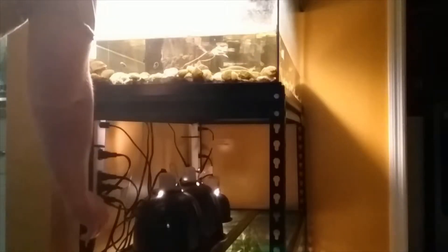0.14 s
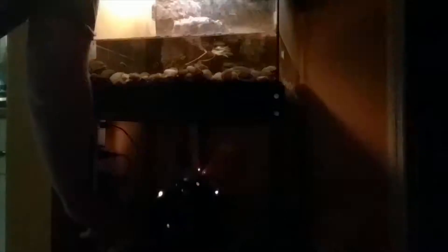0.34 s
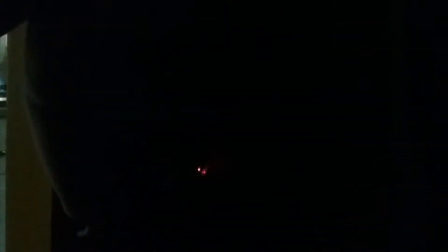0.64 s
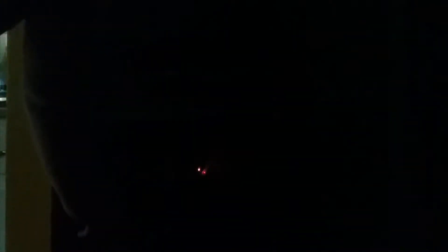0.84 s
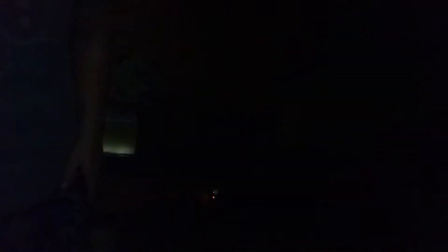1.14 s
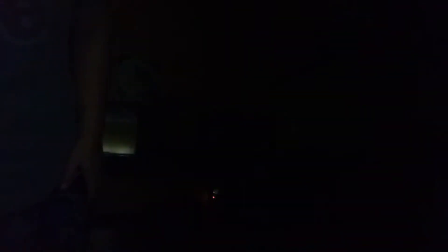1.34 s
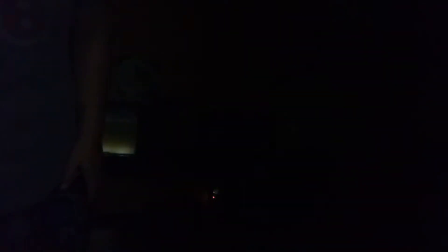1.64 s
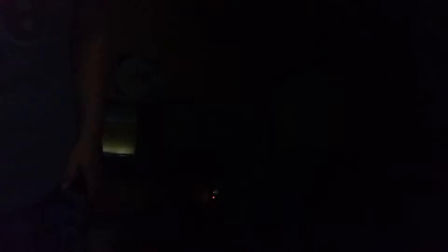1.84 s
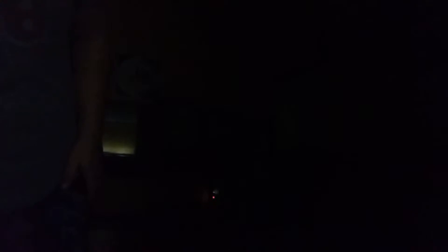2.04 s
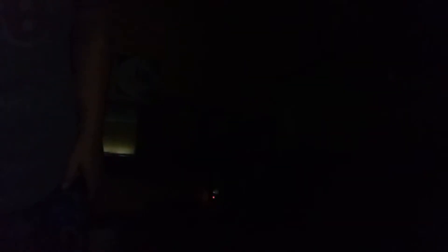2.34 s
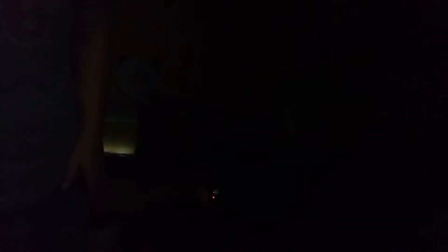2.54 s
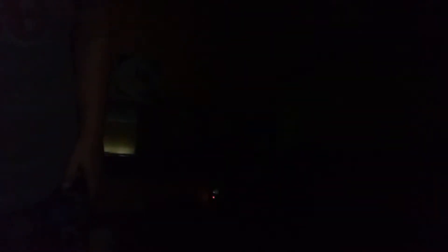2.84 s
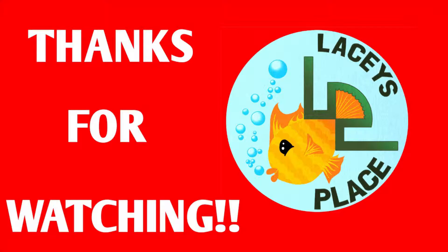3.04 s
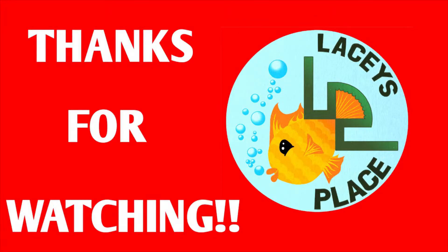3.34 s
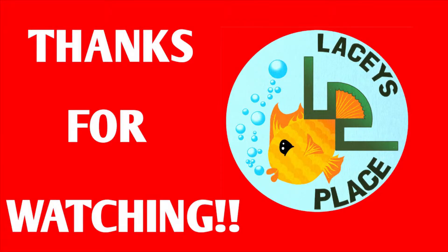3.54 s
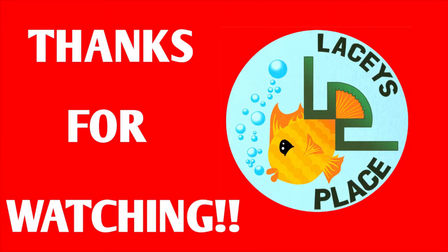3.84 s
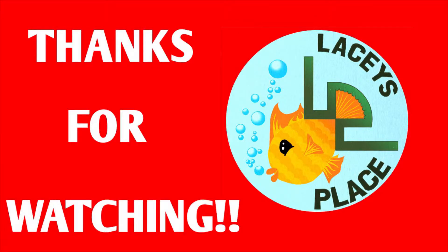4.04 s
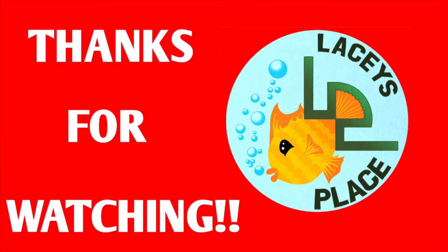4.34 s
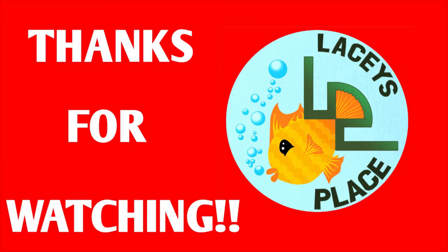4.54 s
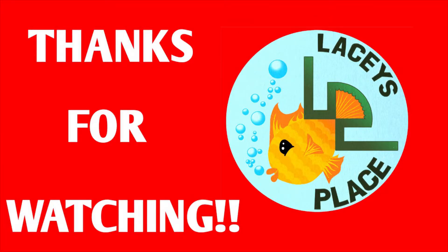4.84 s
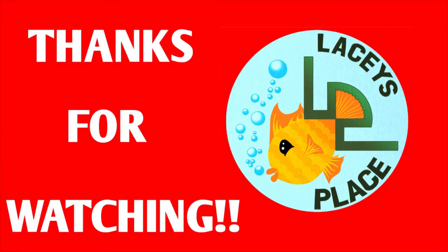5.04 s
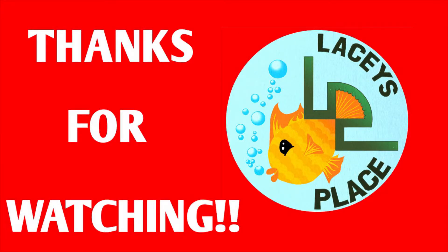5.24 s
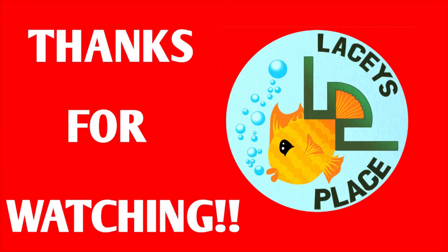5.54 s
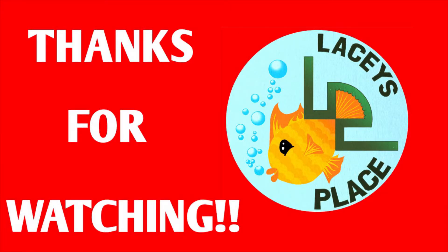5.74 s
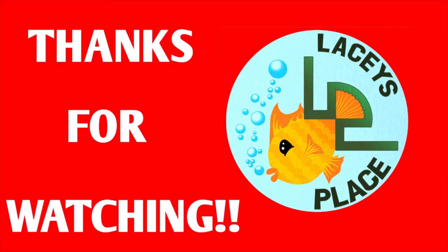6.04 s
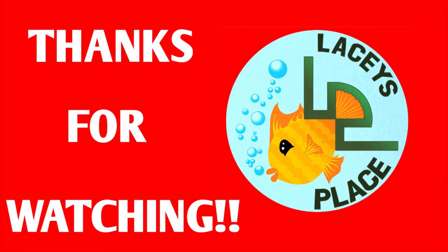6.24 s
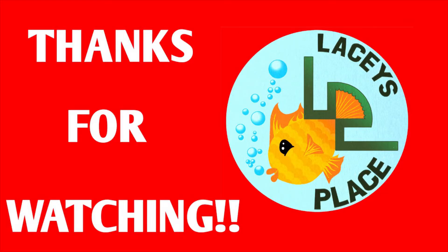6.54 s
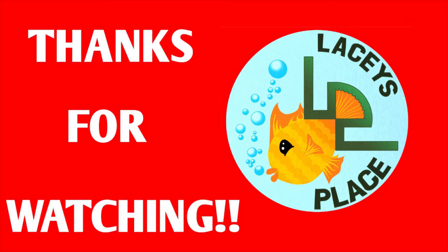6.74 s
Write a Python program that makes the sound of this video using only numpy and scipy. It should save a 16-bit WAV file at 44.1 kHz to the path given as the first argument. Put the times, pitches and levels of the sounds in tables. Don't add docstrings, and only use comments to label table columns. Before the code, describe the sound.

Steady bubbling rush of water in a fish-tank room, strong at first, then abruptly softer with stray glugs and ticks before sudden silence.

```python
import sys
import numpy as np
from scipy import signal
from scipy.fft import rfft, irfft, next_fast_len
from scipy.io import wavfile
from scipy.ndimage import uniform_filter1d

SR = 44100
rng = np.random.default_rng(int(sys.argv[2]) if len(sys.argv) > 2 else 0)


def to_linear_factor(level_db):
    exponent = np.asarray(level_db, float) / 20
    return 10 ** exponent


def store_pcm(level_fs):
    pcm = np.round(np.clip(level_fs, -1, 1) * 32767).astype(np.int16)
    wavfile.write(sys.argv[1], SR, np.atleast_2d(pcm).T)


N = 303849

# (start [s], end [s])
TAKES = [
    (0, .8688),
    (0.8733, 6.3225),
]
# (frequency [Hz], shared [dB per Hz], opposed re shared [dB], left re right [dB])
WATER_SPECTRA = [
    [(45, -81, -17, -3), (80.3, -66.5, -16.5, -2), (151.4, -70.5, -16, -5.5), (270, -69.5, -18, 2.5), (454, -74, -7.5, -11.5), (700, -75.5, 2, 6.5), (1170, -79.5, 2, 3), (1710, -83, 1.5, 5), (2770, -85, -0.5, -5), (4500, -96, 0.5, 7), (6700, -94, -0.8, 5), (9400, -105, 0.5, -18), (11800, -94.5, -1, -3.5), (15260, -90, 0.8, 0)],
    [(45, -94.5, -3, 1), (79, -72, -28, 4.5), (151, -67, -19, -2), (285, -72, -18.5, 8), (490, -72, -4, -2), (740, -76.5, -2.5, 8), (1150, -81.5, 0, -7.5), (1560, -87, 3.5, -2), (2690, -90.5, -1.9, 10.5), (4490, -97, 0.7, -5), (6650, -97, -0.5, 3.5), (9500, -103.5, 1.2, -8), (13000, -95.5, -1, 0.5), (15260, -95.5, 1.5, 2.5)],
]
# (time [s], level [dB])
FLOW_CURVES = [
    [(0.0, -38), (0.65, -37.5), (0.658, -39), (0.74, -36), (0.86, -38.5)],
    [(0.88, -43.5), (1.38, -41), (2.63, -43), (4.16, -40), (4.17, -38), (4.26, -41), (4.29, -39),
     (4.4, -42), (4.46, -40), (4.61, -44), (4.64, -40.5), (6.04, -42), (6.3, -43.5)],
]
FLOW_LAYERS_HZ = (877, 3550, 12000)
FLOW_FOLLOW = (0.96, 1, 0.49)
# (time [s], level [dB], pitch [Hz])
GLUGS = [(0.199, -25, 565), (0.269, -27.5, 1175), (0.34, -22, 588), (0.399, -22.5, 789), (0.527, -35, 595),
         (0.739, -26, 590), (1.269, -42, 686), (1.309, -28, 1330), (2.279, -36, 754), (3.461, -24.5, 484),
         (4.16, -24, 744), (4.428, -27, 598), (4.706, -29.5, 455), (5.533, -27, 502), (5.693, -32, 597),
         (6.266, -34, 664)]
# (time [s], level [dB], pitch [Hz])
DRIPS = [(0.02, -30, 2970), (0.2698, -34, 3260), (.505, -35, 7540), (.675, -35, 5240), (0.7721, -32, 2780),
         (.93, -38, 5950), (1.6616, -34, 3110), (1.72, -40, 5850), (4.1954, -36.5, 2700),
         (5.6917, -36, 3270), (6.308, -36, 6980), (6.311, -38, 6200)]
# (time [s], level [dB], pitch [Hz])
LID_PINGS = [(1.945, -37.5, 6150), (1.96, -37, 6450), (2.23, -38, 6500), (2.26, -40, 6900),
             (2.75, -42, 5100), (3.965, -38.5, 5100), (5.555, -39, 12400), (5.965, -32, 4100)]
# (time [s], level [dB])
SPITS = [(0.0358, -40), (0.0957, -40.5), (0.2848, -36.5), (0.411, -39.5), (0.4494, -38), (0.6752, -37),
         (0.8228, -38), (1.207, -42.5), (1.398, -37), (1.636, -40), (1.995, -39.5), (2.486, -41),
         (2.7145, -43), (2.845, -45), (2.9899, -45.5), (3.1406, -46.5), (3.3395, -45.5), (3.7635, -38.5),
         (3.866, -44), (4.142, -50), (4.194, -43), (4.2444, -39), (4.3497, -40), (4.4048, -40),
         (4.6385, -36), (4.9544, -41.5), (5.551, -37), (5.8977, -37), (6.1475, -47)]
# (time [s], level [dB], upper mids re top [dB], mids re top [dB], crack length [s])
SPLATS = [
    (0.66, -21.5, -2, -7, .002),
    (.5745, -27.5, -18.5, -1, 0.034),
    (3.3700, -13.5, -13.5, -10, 0.0011),
    (1.3982, -32, -15, -14, .0012),
]
# (multiple of mains, shared [dB], opposed [dB], phase of opposed [rad])
PUMP_HUM = [
    [(2, -39.0, -69.9, 2.1), (3, -61.5, -74.4, -1.8), (4, -51.2, -60.9, 1.1), (5, -67.3, -63.5, 0.8), (6, -49.9, -55.3, -0.5), (7, -60.3, -70.2, 1.6), (8, -50.4, -56.0, 1.2), (9, -60.0, -59.5, 3.0), (10, -59.9, -71.0, 1.7), (12, -61.4, -59.5, 2.4), (13, -65.9, -59.3, -1.1), (16, -64.6, -74.1, 1.2), (18, -66.0, -77.7, -1.6), (20, -68.7, -70.5, -0.3)],
    [(1, -70.9, -79.7, -1.2), (2, -46.3, -62.7, 1.6), (3, -52.6, -66.1, -0.2), (4, -56.3, -67.7, -2.8), (6, -55.3, -69.1, 1.5), (7, -60.2, -80.0, 2.4), (8, -57.5, -66.3, -0.6), (9, -71.3, -71.9, -2.5), (10, -63.0, -69.1, 1.6), (11, -62.1, -64.2, 1.8), (12, -63.5, -69.5, -2.8), (13, -60.0, -70.9, 2.5), (20, -71.3, -73.5, 1.8)],
]
# (take index, centre [Hz], width [Hz], level [dB], opposed share [0-1])
IMPELLER_TONES = [(0, 582, 14, -50, .3), (0, 123.8, 1.5, -50, .05), (0, 156, 8, -55, .3),
                  (0, 232, 8, -54, .3), (1, 79, 6, -56, .2), (1, 156, 7, -52, .4),
                  (1, 123.3, 1.2, -55, .15), (1, 234, 8, -55, .3)]
# (level [dB], first pitch [Hz], last pitch [Hz], length [s])
BUMP = (-18.5, 380, 95, .0045)
# (frequency [Hz], share subtracted [0-1], delay [samples])
CROSSFEED = [(100, .9, 20), (1000, .89, 20.1), (2200, .94, 20.5), (3300, .94, 20.1), (4400, .94, 20),
             (9000, .9, 20), (13500, .5, 20)]
# (frequency [Hz], level re signal [dB])
FOLLOWING_NOISE = [(500, -37), (2200, -17), (4400, -14.5), (9000, -12), (14000, -12)]

WANDER_DB, WANDER_HZ = (0.5, 1.18, 0.8), 9
GLUG_CYCLES, GLUG_LEFT = 28, 0.52
DRIP_RING_S, DRIP_LEFT = 0.011, 0.55
PING_RING_S, PING_LEFT = 0.022, 1
SPIT_USUAL_DB, SPIT_CRACK_S, FIZZ_T60_S = -44, 0.03, 0.35
SPIT_UPPER_DB, SPIT_MID_DB = -12, -8
SPIT_SHARPEN = 0.86
STRAY_SPITS, STRAY_DB = 14, -45
MAINS_HZ, BUMP_S, EDGE_HZ = 60.03, 4.6670, 15720
STFT = dict(fs=SR, nperseg=1024, noverlap=768)


def evened(x):
    return x / np.sqrt(np.mean(x ** 2) + 1e-20)


def read(points, hz, axis=1):
    table = np.transpose(points)
    return np.interp(np.log(hz + 1), np.log(table[0] + 1), table[axis])


def add(mix, start_s, sound):
    part = mix[:, round(start_s * SR):][:, :sound.shape[1]]
    part += sound[:, :part.shape[1]]


def panned(left):
    return np.sqrt([[left], [1 - left]])


def drift(t, top_hz):
    hz = np.geomspace(top_hz / 8, top_hz, 16)[:, None]
    waves = np.sin(2 * np.pi * (hz * t + rng.random(hz.shape))) / np.sqrt(hz)
    return evened(waves.sum(0))


def smooth_noise(shape, bands, frames):
    rough = rng.standard_normal(shape)
    return evened(uniform_filter1d(uniform_filter1d(rough, bands, axis=0), frames, axis=1))


def bubble(hz, cycles, glide=0.13):
    turns = np.arange(int(3 * cycles * SR / hz)) * hz / SR
    shape = np.exp(-2 * turns / cycles) * (1 - np.exp(-turns / 2.9))
    return shape * np.sin(2 * np.pi * turns * (1 + glide * turns / (3 * cycles)))


def froth(per_s=2500, spread_db=3.0, cycles=7):
    out = np.zeros((2, N))
    strength = to_linear_factor(spread_db * np.minimum(rng.exponential(1, (2, N)), 4))
    strength *= rng.random((2, N)) < per_s / SR
    kind = rng.integers(0, 30, (2, N))
    for k, hz in enumerate(np.geomspace(250, 14000, 30)):
        grain = bubble(hz, cycles * rng.uniform(0.65, 1.0))
        grain = grain / np.linalg.norm(grain) * np.sqrt(hz)
        out += signal.oaconvolve(strength * (kind == k), grain[None], axes=1)[:, :N]
    return evened(out)


def flow_swell(hz, t, later):
    first, second = [np.interp(t, s, db) - np.mean(db) for s, db in map(np.transpose, FLOW_CURVES)]
    flow = np.where(later, second, first)
    layers = np.array([follow * flow + wander_db * drift(t, WANDER_HZ)
                       for follow, wander_db in zip(FLOW_FOLLOW, WANDER_DB)])
    place = np.interp(np.log(hz + 1), np.log(FLOW_LAYERS_HZ), np.arange(3))
    return np.clip(1 - abs(place[:, None] - np.arange(3)), 0, 1) @ layers


def water(froth_share=0.4, patchy_db=1.67, gust_db=1.04, level_db=46):
    wash = rng.standard_normal((2, N))
    a, b = froth_share * froth() + np.sqrt(1 - froth_share ** 2) * wash
    hz, t, z = signal.stft([a + b, a - b], **STFT)
    later = t > TAKES[1][0]
    first, second = WATER_SPECTRA
    shared_db, opposed_db, lean_db = [
        np.where(later[None], read(second, hz, k)[:, None], read(first, hz, k)[:, None]) for k in (1, 2, 3)]
    patches = smooth_noise(shared_db.shape, 14, 8)
    gusts = smooth_noise(shared_db.shape, 90, 5)
    gusts *= np.clip(hz / 6000, 0.3, 1.5)[:, None]
    both = z[0] * to_linear_factor(shared_db)
    apart = z[1] * to_linear_factor(shared_db + opposed_db)
    ports = np.array([(both + apart) * to_linear_factor(lean_db / 2), (both - apart) * to_linear_factor(-lean_db / 2)])
    ports *= to_linear_factor(level_db + flow_swell(hz, t, later) + patchy_db * patches + gust_db * gusts)
    return signal.istft(ports, **STFT)[1][:, :N] / 2


def gurgle(per_s=110, cycles=30, level_db=-47, spread_db=3):
    out = np.zeros((2, N))
    for place, size, strength, left in rng.random((int(per_s * N / SR), 4)):
        hz = 600 * 9 ** size
        gain = to_linear_factor(level_db - 16 * size - spread_db * np.log(strength + 0.0275))
        add(out, place * N / SR, gain * panned(left) * bubble(hz, cycles, glide=0.046))
    return out


def big_bubbles(level_db=-7):
    out = np.zeros((2, N))
    rows = [(*row, GLUG_CYCLES, GLUG_LEFT) for row in GLUGS]
    rows += [(*row, DRIP_RING_S * row[2], DRIP_LEFT) for row in DRIPS]
    rows += [(*row, PING_RING_S * row[2], PING_LEFT) for row in LID_PINGS]
    for start_s, db, hz, cycles, left in rows:
        add(out, start_s, to_linear_factor(db + level_db) * panned(left) * bubble(hz, cycles, glide=0.024))
    return out


def spits(tail_db=-13, level_db=-11):
    t, out = np.arange(12288) / SR, np.zeros((2, N))
    hz = np.fft.rfftfreq(len(t), 1 / SR)
    stray = [(place * TAKES[1][1], STRAY_DB) for place in rng.random(STRAY_SPITS)]
    rows = list(SPLATS)
    for start_s, db in list(SPITS) + stray:
        thinned_db = SPIT_SHARPEN * (db - SPIT_USUAL_DB)
        rows.append((start_s, db, SPIT_UPPER_DB - thinned_db, SPIT_MID_DB - thinned_db, SPIT_CRACK_S))
    for start_s, db, upper_db, mid_db, crack_s in rows:
        air = rng.standard_normal((2, len(t)))
        colour = [(900, mid_db - 14), (3300, mid_db + 4), (7000, upper_db + 5),
                  (9500, -5), (12000, -1), (15500, 1)]
        fizz = evened(irfft(rfft(air) * to_linear_factor(read(colour, hz)) * (hz < EDGE_HZ), len(t)))
        shape = np.exp(-t / crack_s) + to_linear_factor(tail_db - 60 * t / FIZZ_T60_S)
        attack = 1 - np.exp(-t / 0.0004)
        add(out, start_s, to_linear_factor(db + level_db) * fizz * shape * attack)
    return out


def pumps(waver_db=0.8):
    t, out = np.arange(N) / SR, np.zeros((2, N))
    slow = t[::256]
    for (start_s, end_s), rows in zip(TAKES, PUMP_HUM):
        heard = (t >= start_s) & (t < end_s)
        for multiple, shared_db, opposed_db, phase in rows:
            turn = 2 * np.pi * (round(multiple) * MAINS_HZ * t + rng.random())
            waver = to_linear_factor(np.interp(t, slow, waver_db * drift(slow, 7.6))) * heard
            both = to_linear_factor(shared_db) * np.cos(turn)
            apart = to_linear_factor(opposed_db) * np.cos(turn + phase)
            out += np.sqrt(2) * waver * np.array([both + apart, both - apart])
    return out


def impellers():
    hz, t, out = np.fft.rfftfreq(N, 1 / SR), np.arange(N) / SR, np.zeros((2, N))
    for take, centre_hz, width_hz, db, opposed in IMPELLER_TONES:
        band = np.exp(-((hz - centre_hz) / width_hz) ** 2)
        a, b = irfft(rfft(rng.standard_normal((2, N))) * band, N)
        heard = (t >= TAKES[take][0]) & (t < TAKES[take][1])
        out += to_linear_factor(db) * heard * evened(np.array([a + opposed * b, a - opposed * b]))
    return out


def bump():
    db, first_hz, last_hz, length_s = BUMP
    t, out = np.arange(3000) / SR, np.zeros((2, N))
    hz = last_hz + (first_hz - last_hz) * np.exp(-t / 0.0035)
    swing = -np.sin(2 * np.pi * np.cumsum(hz) / SR) * to_linear_factor(db - (t / length_s) ** 2)
    add(out, BUMP_S, swing * (1 - np.exp(-t / 0.0012)) * np.array([[-0.1], [1]]))
    return out


def following_noise(x, flicker_db=5):
    hz, _, z = signal.stft(x, **STFT)
    level = np.sqrt(uniform_filter1d((abs(z) ** 2).mean(0), size=9, axis=0))
    flicker = smooth_noise(level.shape, 12, 5)
    noise = signal.stft(rng.standard_normal(x.shape), **STFT)[2]
    noise /= np.sqrt(np.mean(abs(noise) ** 2))
    noise *= level * to_linear_factor(read(FOLLOWING_NOISE, hz)[:, None] + flicker_db * flicker)
    return signal.istft(noise, **STFT)[1][:, :N]


def scene():
    return water() + gurgle() + big_bubbles() + spits() + pumps() + impellers() + bump()


def widened(dry):
    size = next_fast_len(N + 64)
    hz = np.fft.rfftfreq(size, 1 / SR)
    delay_s = read(CROSSFEED, hz, axis=2) / SR
    late = read(CROSSFEED, hz) * np.exp(-2j * np.pi * hz * delay_s)
    ports = rfft(dry, size) * to_linear_factor(-60 * np.clip((hz - EDGE_HZ) / 300, 0, 1))
    return irfft(ports - late * ports[::-1], size)[:, :N]


def take_gate():
    t = np.arange(N) / SR
    second_s, end_s = TAKES[1]
    on = sum((t >= start) & (t < end) for start, end in TAKES)
    gap = to_linear_factor(-25) * (t < second_s)
    fading = to_linear_factor(-63 - 1600 * np.maximum(t - end_s, 0)) * (t < end_s + 0.03)
    return uniform_filter1d(np.maximum(on, np.maximum(gap, fading)), size=24)


def top_cut(x):
    return signal.sosfilt(signal.butter(12, 16470, fs=SR, output="sos"), x)


def record(dry):
    wide = widened(dry)
    mix = (wide + following_noise(wide)) * take_gate()
    return top_cut(mix)


dry = scene()
out = record(dry)
store_pcm(out)
```